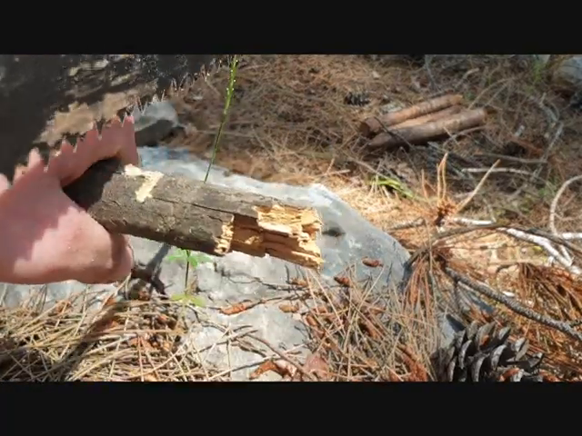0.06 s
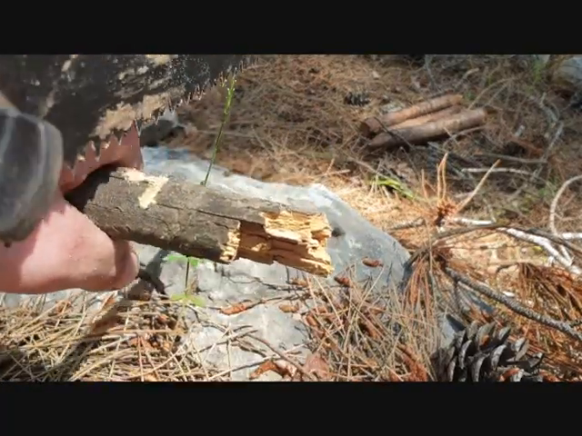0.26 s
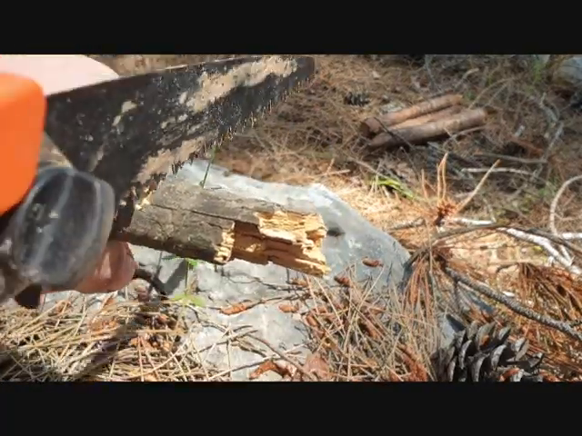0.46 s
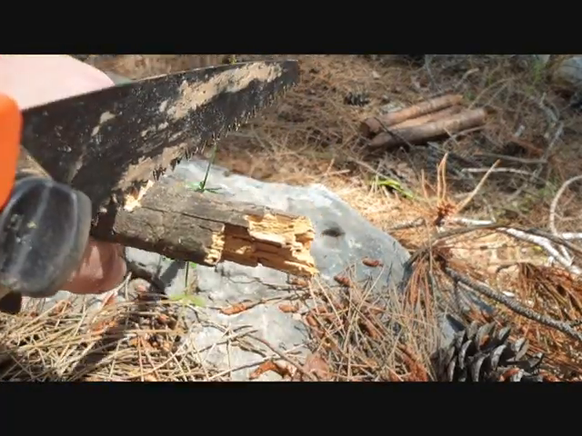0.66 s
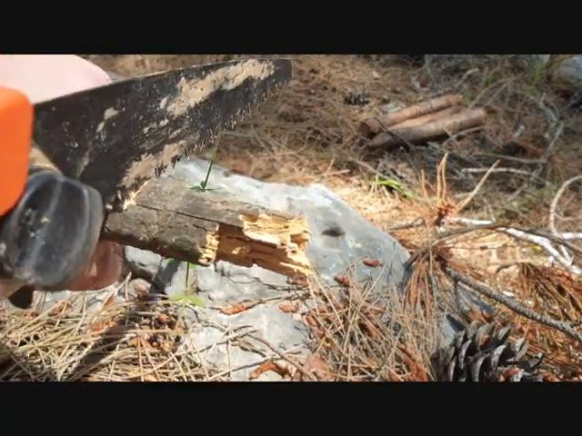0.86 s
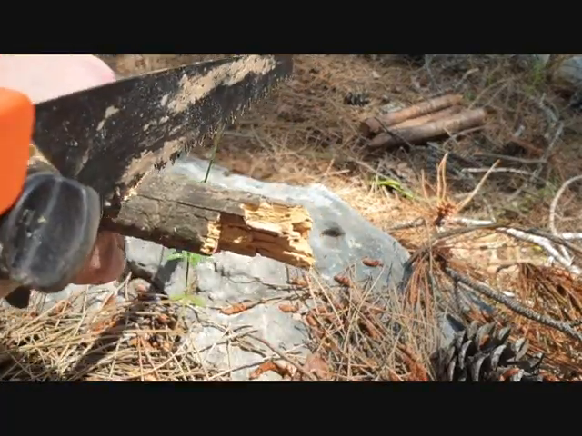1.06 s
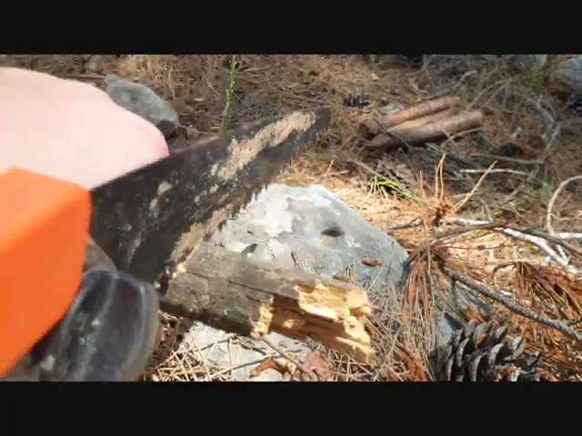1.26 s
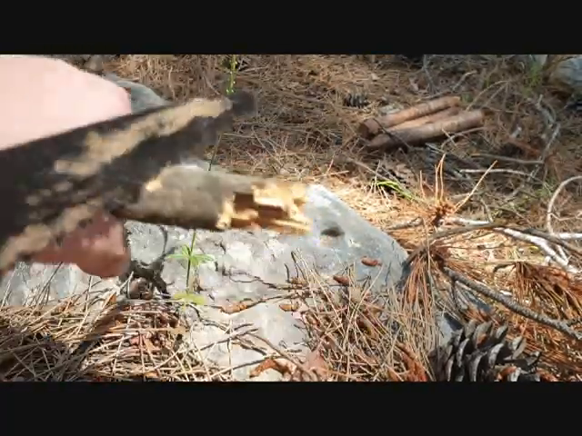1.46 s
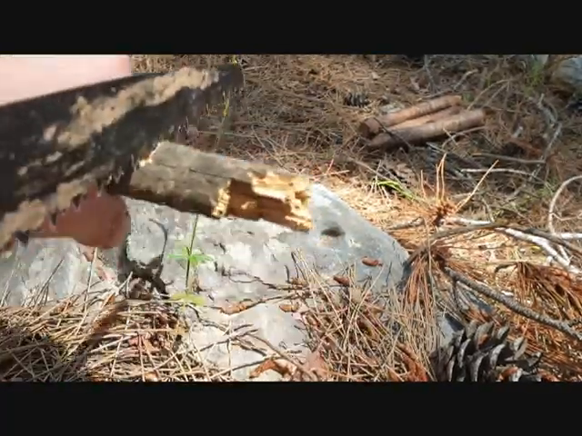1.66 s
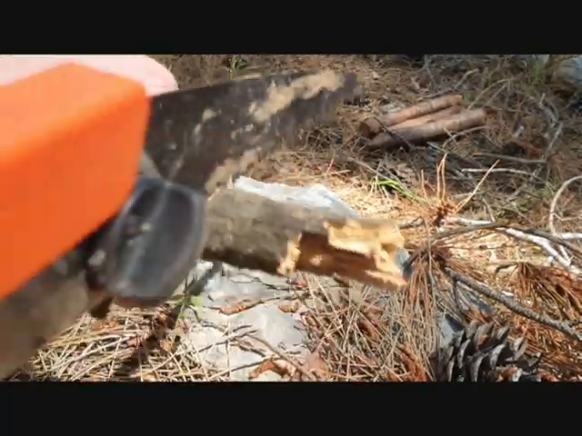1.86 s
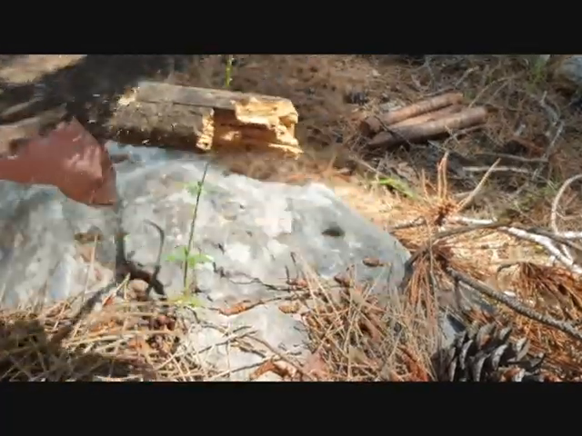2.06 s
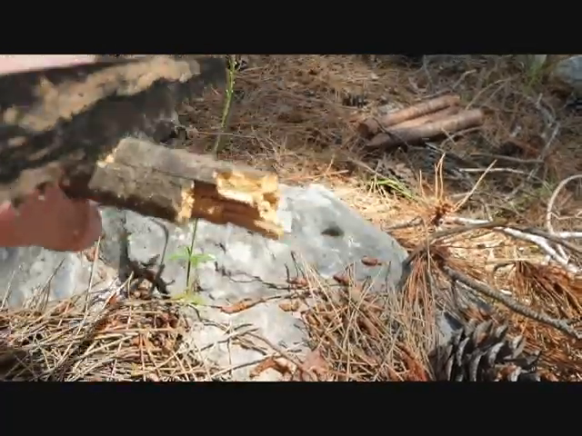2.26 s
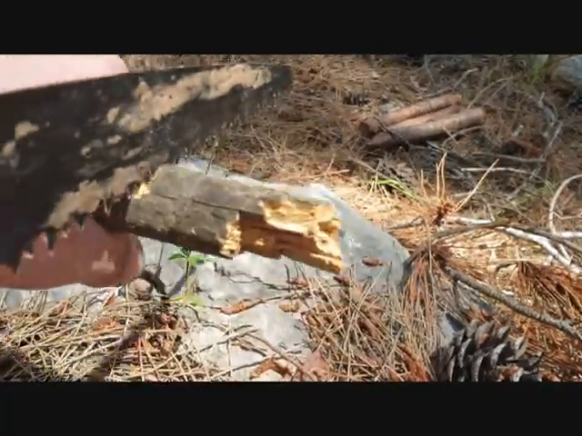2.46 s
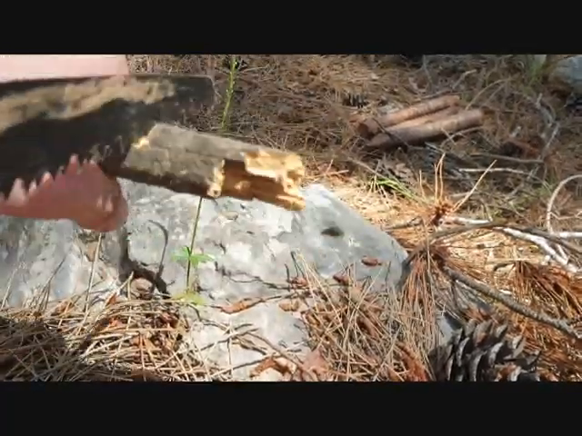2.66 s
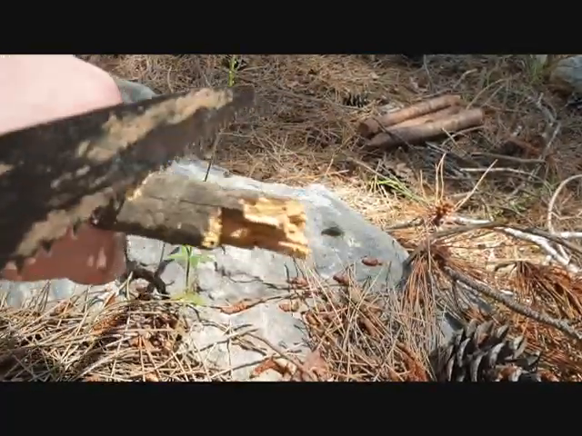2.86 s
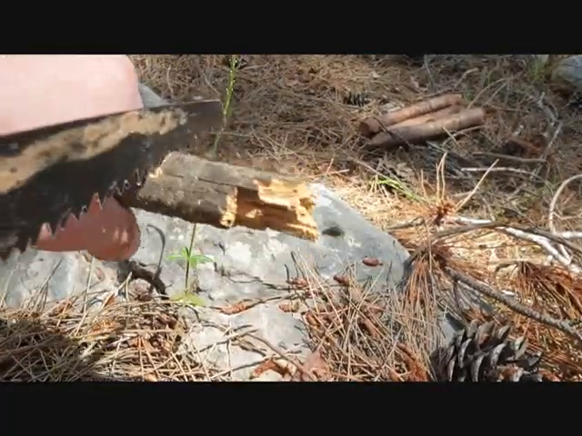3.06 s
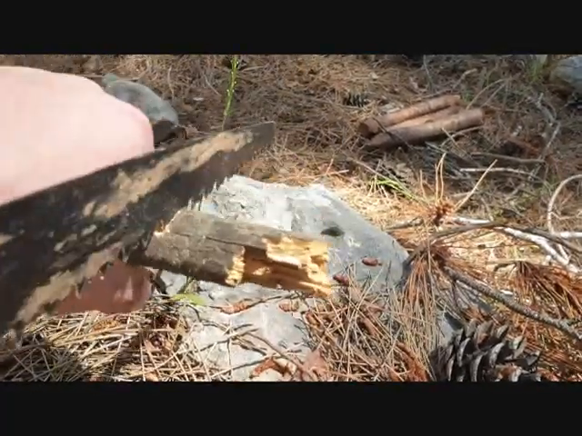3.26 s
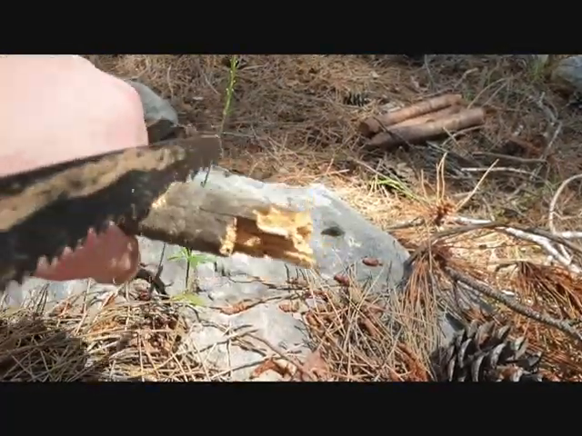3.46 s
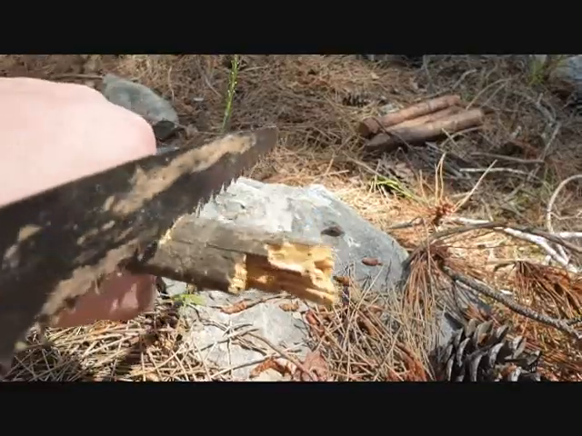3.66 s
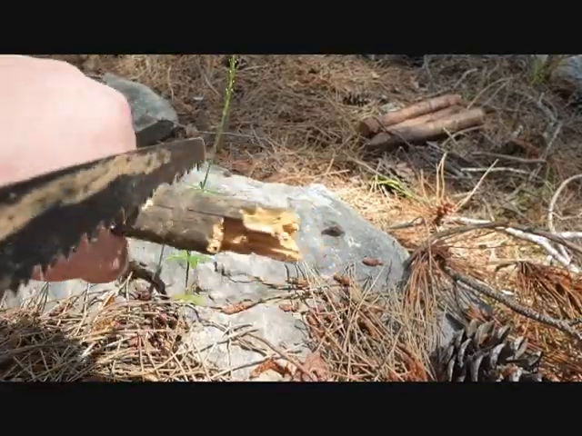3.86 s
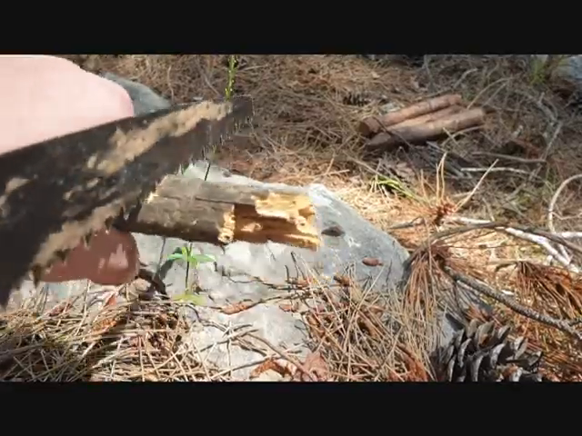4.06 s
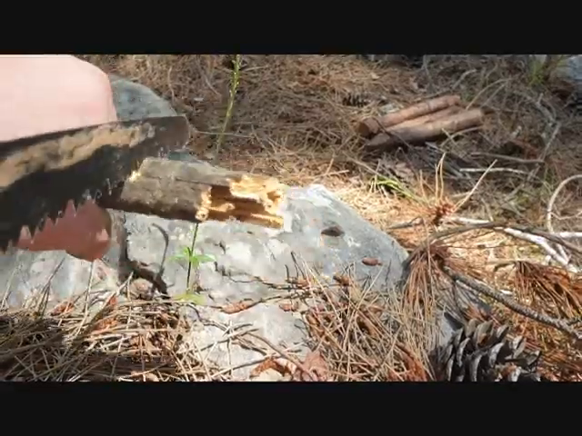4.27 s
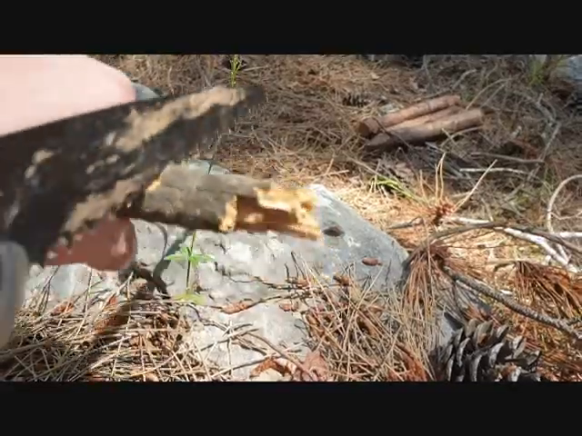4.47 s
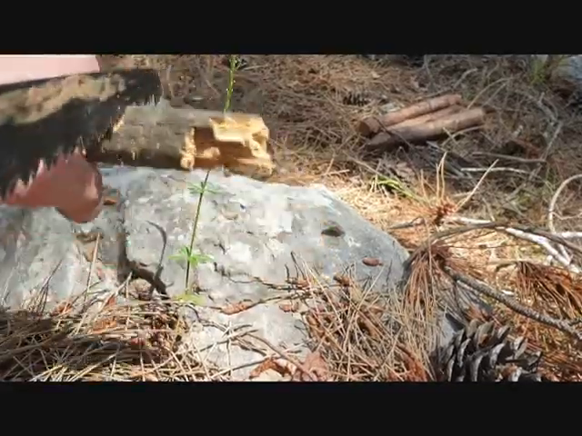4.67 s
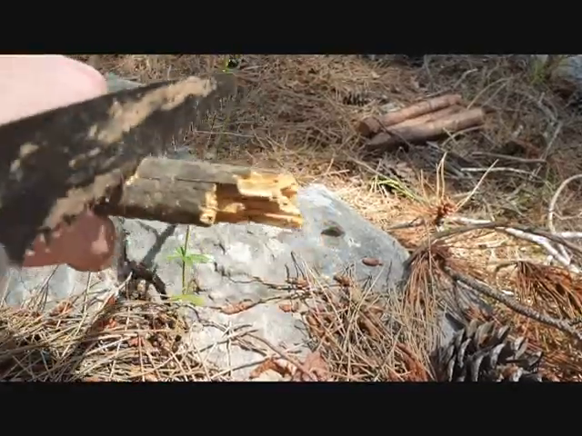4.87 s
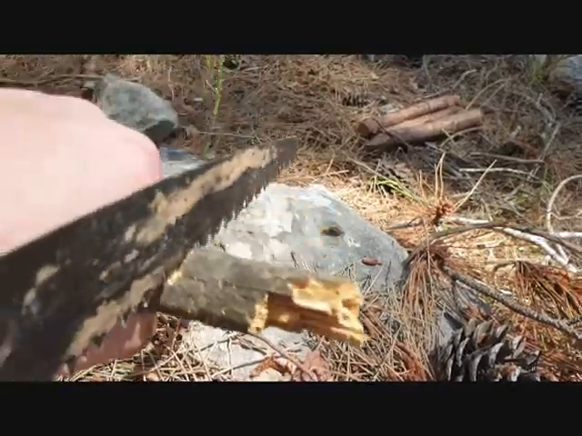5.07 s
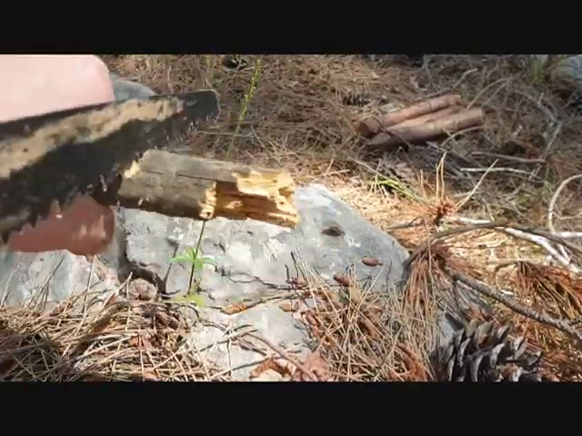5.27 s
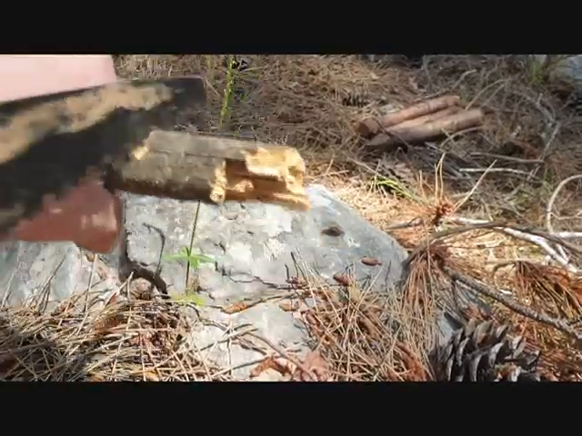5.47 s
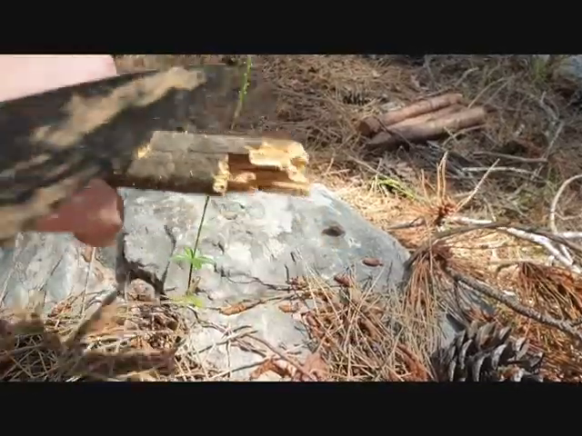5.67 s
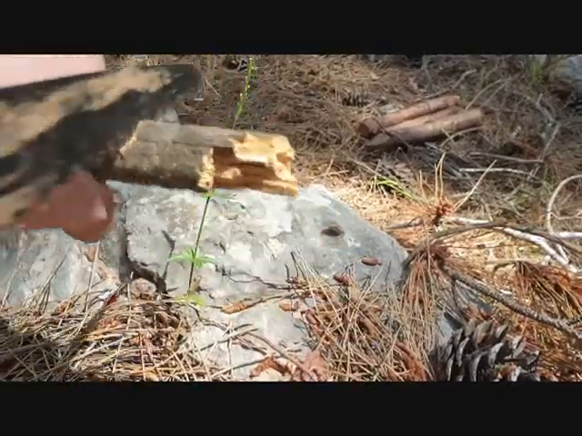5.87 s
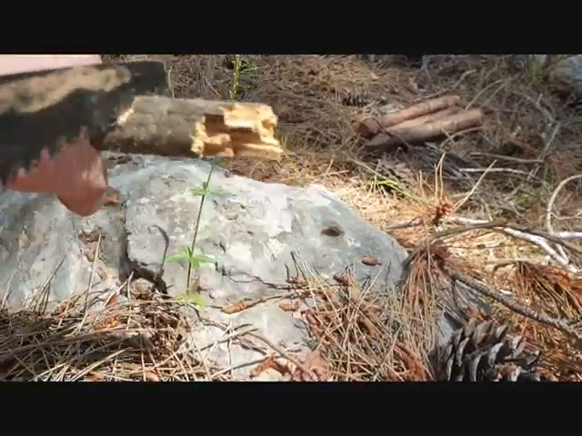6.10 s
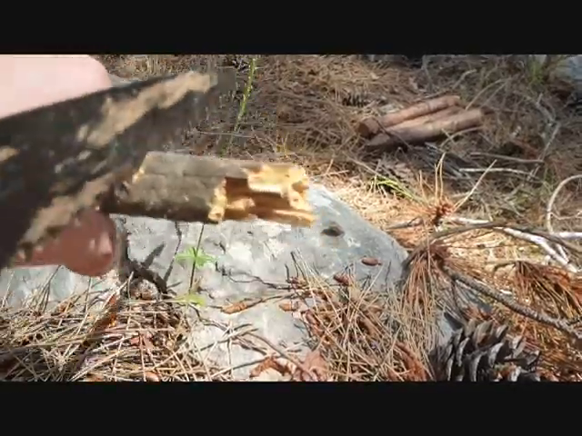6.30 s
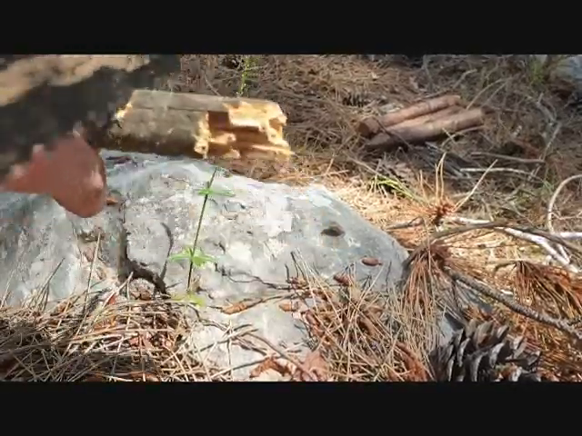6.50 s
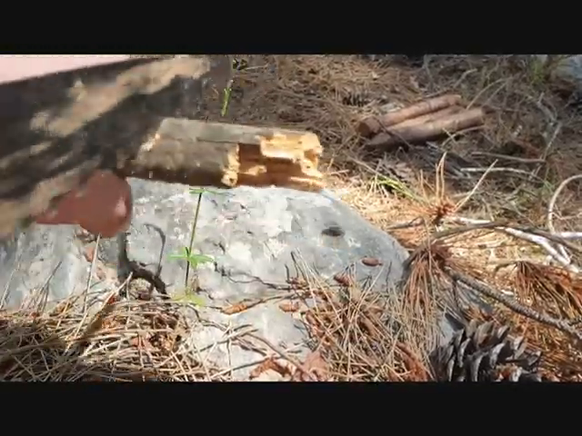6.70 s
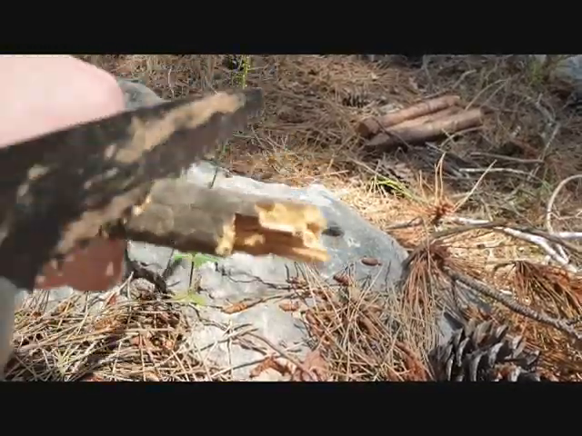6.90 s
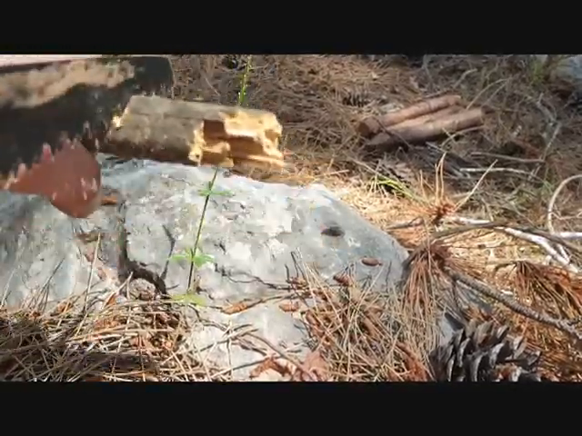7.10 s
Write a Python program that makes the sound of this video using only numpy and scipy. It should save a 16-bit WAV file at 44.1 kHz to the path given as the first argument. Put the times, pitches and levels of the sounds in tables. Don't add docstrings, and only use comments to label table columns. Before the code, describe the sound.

Near silence in a pine wood: faint wind, thin insects and hiss, with a few tiny brushes of a saw on bark. Then quick sawing begins, alternating strokes rasping harshly through a dry stick, teeth snagging in crackly jerks, low thuds shaking the microphone. It continues unevenly to the end. Very close, bright and dry, strongly to the left.

```python
import sys
import numpy as np
from scipy import signal
from scipy.fft import rfft, irfft
from scipy.io import wavfile
from scipy.ndimage import uniform_filter1d

SR = 44100
rng = np.random.default_rng(int(sys.argv[2]) if len(sys.argv) > 2 else 0)


def voltage_ratio(decibels):
    exponent = np.asarray(decibels, float) / 20
    return 10 ** exponent


def output_pcm(signal):
    pcm = np.clip(np.atleast_2d(signal).T, -1, 1) * 32767
    wavfile.write(sys.argv[1], SR, np.round(pcm).astype(np.int16))


N = 314874
HOP = 64

# start t/s, speeding up t/s, slowing down t/s, scrape level/dB, wood body level/dB
PULLS = [(1.508, 0.05, 0.077, -21, -15), (2.024, 0.15, 0.11, -32.5, -11), (2.604, 0.064, 0.086, -26.5, -14),
         (3.027, 0.065, 0.091, -29.5, -17.5), (3.41, 0.092, 0.064, -32, -14),
         (3.846, 0.046, 0.11, -29, -13), (4.204, 0.07, 0.087, -29.2, -14),
         (4.644, 0.085, 0.075, -26, -18.5), (5.246, 0.047, 0.11, -30.5, -11),
         (5.377, 0.081, 0.078, -37.5, -11), (5.749, 0.083, 0.07, -26.5, -26.5),
         (6.106, 0.09, 0.092, -29, -13), (6.446, 0.062, 0.077, -24, -16), (6.726, 0.12, 0.071, -27, -13.5),
         (7.061, 0.09, 0.12, -29, -11)]
PUSHES = [(1.83, 0.052, .18, -34.5, -12), (2.274, .1, 0.14, -37, -9.5), (2.809, 0.059, 0.12, -29.5, -13),
          (3.193, .089, 0.074, -34, -10), (3.622, .03, 0.091, -30, -10), (3.999, 0.083, 0.086, -31.5, -9.5),
          (4.428, 0.055, 0.14, -29, -11), (4.816, 0.059, 0.11, -30, -12.5), (5.535, 0.08, 0.13, -31, -7.5),
          (5.945, 0.054, 0.093, -25, -9.5), (6.259, .09, 0.073, -27.5, -12),
          (6.602, 0.049, .11, -25.5, -10.5), (6.916, 0.074, 0.079, -25, -10)]
BRUSHES = [
    (.59, 0.012, 0.036, -74, -23),
    (.766, 0.013, .03, -74, -5),
    (.82, 0.015, 0.042, -79.5, -1),
    (0.983, 0.03, .03, -56.5, -7),
    (1.149, 0.017, 0.061, -53.5, -13),
    (3.565, 0.044, .06, -46.5, -12),
]
# start t/s, length t/s, contact level/dB
LIFTS = [(1.634, .2, -19.5), (2.493, .11, -23), (2.748, 0.088, -19.5), (2.97, 0.05, -9.5),
         (3.352, 0.053, -4.5), (3.743, 0.074, -27), (4.163, .05, -8), (4.367, 0.037, -11),
         (4.98, .275, -14), (5.905, .045, -7.5), (6.431, 0.011, -4.5), (6.58, 0.032, -6.5)]
# t/s, level/dB, top minus middle level/dB
HARD_SNAGS = [(1.5288, -16.5, 15), (1.5444, -12, 12), (1.5586, -11, 18), (1.5725, -4.5, -1),
              (1.8992, -7.5, -6.5), (1.921, -8.5, 3.5), (1.973, -28, 8.5), (1.9892, -31, -5.5),
              (2.0042, -25.5, -7), (2.1274, -13.5, -9), (2.1335, -11.5, 1.5), (2.17, -22, -1),
              (2.322, -20.5, -8), (2.3506, -7, 4), (2.382, -15.5, 3.5), (2.4064, -15.5, 0),
              (2.4424, -22.5, 0.5), (2.6583, -11.5, -6.5), (2.6773, -9, -2), (2.7056, -11, -8.5),
              (2.856, -17.5, -4.5), (2.889, -19.5, 7.5), (3.0676, -11, -12), (3.0959, -8.5, -3),
              (3.112, -18, -2), (3.1252, -27.5, 0), (3.2558, -21.5, -5.5), (3.479, -5.5, 6.5),
              (3.659, -12.5, 6), (3.9035, -5, -4.5),
              (4.0461, -21, -7.5), (4.0547, -24, -2), (4.2658, -13.5, 9.5), (4.541, -17, -4.5),
              (4.704, -10, 1.5), (4.7194, -5.5, -2.5), (4.7369, -18.5, 17), (4.846, -17.5, 19.5),
              (4.894, -11.5, 9), (4.907, -5.5, -5), (5.297, -13.5, 8), (5.3408, -14.5, 0),
              (5.5584, -18, -1.5), (5.5815, -18.5, -3.5), (5.6161, -17.5, -9.5), (5.79, -21, 5),
              (6.0295, -17.5, 16.5), (6.1711, -6.5, 11.5), (6.2049, -7.5, -1), (6.315, -19, 8),
              (6.3665, -13, 3), (6.4776, -10.5, -5), (6.499, -10.5, -9.5), (6.5296, -6.5, 0.5),
              (6.6383, -11.5, 16), (6.7994, -11, 0), (6.827, -5.5, -10), (6.8398, -19, 0.5),
              (6.948, -24.5, -5.5), (7.128, -11, 7)]
# t/s, level/dB, top minus middle level/dB
TOUCHES = [(.596, -52, -2), (0.6112, -47, -2), (.768, -53, 10), (0.7885, -46, 20), (0.83, -51.5, -11),
           (1.0079, -30.5, -1.5), (1.1523, -28, -13.5), (1.1546, -34, -15.5), (1.624, -18, -11),
           (1.7939, -53, 16), (1.8076, -46, 21.5), (1.8581, -24.5, -4), (2.4889, -30.5, -8.5),
           (2.5111, -52, -10), (2.5778, -62, -17), (2.6147, -23, 11.5), (2.7644, -39, -3.5),
           (2.8158, -24.5, 3), (3.2043, -39.5, 6.5), (3.577, -30, 25.5), (3.6302, -12.5, 15),
           (3.79, -53.5, 13), (4.226, -15.5, -0.5), (4.3755, -27.5, 9.5), (4.397, -37, -10.5),
           (4.435, -10, 1), (4.8245, -23.5, 18.5), (5.9217, -27, 17.5), (5.948, -26, 9),
           (5.9693, -16.5, 11)]
# f/Hz, level/dB, t60/s
MODES = [(254, -8, 0.011), (506, 4, 0.0098), (870, -20, 0.0057), (1602, -2.5, 0.015), (2612, -4, 0.019),
         (3106, -0.5, 0.028), (4532, -5, 0.011), (5143, -5, .011), (5870, -11, 0.0037), (7070, 1, 0.0037),
         (7970, 6.5, 0.0093), (9500, -5.5, 0.0018), (10860, -2.5, 0.0014), (13340, 2.5, 0.0021),
         (14840, -5.5, 0.0056)]
# t/s, centre f/Hz
BITE_REGION = [
    (1.2, 2300),
    (1.5, 2800),
    (1.7, 2800),
               (1.85, 4030),
    (2.4, 5080),
    (7.14, 4960),
]
# f/Hz, level/dB per Hz
CUT_SPECTRUM = [(88, -44), (150, -11.5), (259, -7), (382, -14.5), (474, -8), (1140, -7), (3070, -5.5),
                (3460, -6), (5000, -2.5), (8640, -10.5), (9340, -6), (13500, -7.5), (15800, -7.5)]
# f/Hz, left minus right level/dB
SHADOW = [(60, 11.5), (110, 10), (200, 17), (380, 13), (700, 13.5), (1290, 10), (2380, 13), (4400, 14.5),
          (8120, 19), (15000, 19.5)]
# f/Hz, level/dB per Hz
SHAKE_SPECTRUM = [(12, -34.5), (20, -20.5), (65, 4), (82, 2), (119, -8.5), (200, -15), (260, -49.5),
                  (440, -120)]
# t/s, level/dB
WIND = [(0.0, -44.5), (0.24, -60), (1.431, -50.5), (1.749, -64.5), (2.1, -48.5), (2.54, -60.5), (3.5, -60),
        (4.6, -57.5), (5.1, -57.5), (5.7, -52), (6.8, -47), (7.14, -50)]
# t/s, level/dB
GRIP = [(1.5, -3), (2.1, 1), (2.9, 4), (3.45, -2.5), (3.65, -8), (4.2, 0.5), (4.9, 1.5), (5.3, -2.5),
        (5.7, -2.5), (6.6, -1), (6.85, 4), (7.14, 0)]
# t/s, peak level/dB, f/Hz, left minus right level/dB
KNOCKS = [(1.191, -41, 68, 26), (2.038, -11, 250, -8), (2.055, -27, 146, -1), (2.169, -41, 71, 14),
          (4.58, -42, 60.5, 12.0), (3.37, -41, 61, 12), (0.02, -42, 40, 12), (5.178, -24.5, 56.5, 31),
          (5.297, -29.5, 72.7, 13), (6.17, -27, 66.6, 20), (6.84, -40, 67.3, 10)]
# f/Hz, level/dB per Hz
WOOD_SPECTRUM = [(71, -45.5), (120, -10), (138, -12), (208, -13.5), (240, -13.5), (307, -19), (417, -30.5),
                 (870, -32), (1850, -40.5), (2510, -32), (5040, -52), (6700, -37), (8390, -55),
                 (13700, -39.5), (15800, -57)]

RISE_POWER, FALL_POWER = 1.705, 2.98
DUST_DB, DUST_S = -17, 0.11
LIFT_SLEW_S = 0.012
SLOW_WOOD_DB_PER_DB, SLOW_SIZZLE_DB_PER_DB = 0.1, 0.21
LESSER_PER_S, LESSER_DB, LESSER_SPREAD_DB = 70, 5.5, 3
TRICKLE_S, TRICKLE_DB, TRICKLE_FADE_S = 4.96, -61.5, 0.12
PORT_LAG_S = 3.4e-4
PULL_JOLT_DB, PUSH_JOLT_DB, JOLT_POWER, JOLT_S = -12, -18.5, 0.84, 0.013
WOOD_DB = -64.5
TOP_HZ = 15700


def saw():
    moving = strokes(PULLS + PUSHES + BRUSHES)
    effort, woody = moving + contact() * linger(moving, DUST_DB, DUST_S)
    slack = np.clip(effort / effort.max(), 0.003, 1)
    fine, coarse, tear = rng.standard_normal((3, 2, N))
    tear = tear / np.sqrt(uniform_filter1d(tear ** 2, size=16, axis=1))
    scrape = fine * grains(5000, 1.8, 0.0004) * voltage_ratio(1.5 * walk(40))
    bites = coarse * grains(200, 2.0, 0.0045)
    force = (1.028 * scrape + 0.69 * bites) * voltage_ratio(5.5)
    snap, bright = snags(moving[0])

    low = force * woody * slack ** -SLOW_WOOD_DB_PER_DB * voltage_ratio(11)
    low = low + voltage_ratio(-7.5) * tear * fade(snap, 0.0031)
    middle = force * effort + tear * (fade(snap, 0.0008) + 0.35 * fade(snap, 0.009))
    top = force * effort * slack ** SLOW_SIZZLE_DB_PER_DB * voltage_ratio(5)
    top = top + force * trickle()
    top = top + tear * (fade(bright, 0.0007) + 0.35 * fade(bright, 0.007))

    bass = soft(soft(low, 2700), 2700)
    rest = soft(soft(middle, 2700), 2700)
    push = bass + soft(middle, 6920) - rest + top - soft(top, 11540)
    faces = colour(push + body(push), CUT_SPECTRUM)
    gain = np.std(band(middle[0], 1400, 11540)) / np.std(band(faces[0], 1500, 6370))
    ports = at_ports(faces * gain)
    return ports + ground_wash(ports[:1])


def strokes(rows):
    out = np.full((2, N), 1e-9)
    for start_s, rise_s, fall_s, scrape_db, wood_db in rows:
        i = int(start_s * SR)
        t = np.arange(min(int((rise_s + fall_s) * SR), N - i)) / SR
        up = np.clip(t / rise_s, 0, 1) * np.pi / 2
        down = np.clip((t - rise_s) / fall_s, 0, 1) * np.pi / 2
        speed = np.sin(up) ** RISE_POWER * np.abs(np.cos(down)) ** FALL_POWER
        out[:, i:i + len(t)] += voltage_ratio(np.array([[scrape_db], [scrape_db + wood_db]])) * speed
    return out


def contact():
    db = np.zeros(N)
    for start_s, length_s, lift_db in LIFTS:
        db[int(start_s * SR):int((start_s + length_s) * SR)] = lift_db
    return voltage_ratio(uniform_filter1d(db, int(LIFT_SLEW_S * SR)))


def grains(per_s, spread_db, tau_s):
    when = rng.random(N) < per_s / SR
    size = rng.exponential(1, N)
    return level(fade(when * voltage_ratio(np.minimum(spread_db * size, 14)), tau_s))


def snags(stroke):
    when = rng.random(N) < LESSER_PER_S / SR
    size, tilt = rng.exponential(1, N), rng.standard_normal(N)
    lesser = when * stroke * voltage_ratio(LESSER_DB + np.minimum(LESSER_SPREAD_DB * size, 4))
    snap = lesser * voltage_ratio(-3.0 * tilt - 4)
    bright = lesser * voltage_ratio(3.0 * tilt - 2)
    for s, db, tilt_db in HARD_SNAGS + TOUCHES:
        snap[int(s * SR)] = voltage_ratio(db - tilt_db / 2 - 4.5)
        bright[int(s * SR)] = voltage_ratio(db + tilt_db / 2)
    return snap, bright


def trickle():
    after_s = np.arange(N) / SR - TRICKLE_S
    running = (after_s > 0) * (after_s < 0.2)
    return voltage_ratio(TRICKLE_DB) * running * np.exp(-np.abs(after_s) / TRICKLE_FADE_S)


def body(push):
    t = np.arange(N // HOP + 1) * HOP / SR
    bite_hz = np.interp(t, *np.transpose(BITE_REGION))
    out = 0
    for hz, db, t60_s in MODES:
        shift, swell, flicker = (walk(rate_hz, size=HOP) for rate_hz in (14, 10, 50))
        favour_db = 7.5 * np.exp(-(np.log2(hz / bite_hz) / 0.51) ** 2)
        drive = voltage_ratio(db + 2.0 + favour_db + 2.5 * swell + 5.7 * flicker)
        mode_hz = hz * (1 + 0.028 * shift)
        out = out + ring(push * drive.repeat(HOP)[:N], mode_hz.repeat(HOP)[:N], t60_s)
    return out


def ring(x, hz, t60_s):
    turn = np.exp(2j * np.pi * np.cumsum(hz) / SR)
    keep = np.exp(-np.log(1000) / (t60_s * SR))
    return (signal.lfilter([2 - 2 * keep], [1, -keep], x * turn.conj()) * turn).real


def at_ports(faces):
    near, other = faces
    far = 0.5 * near + 0.5 * soft(near, 540) + 1.5 * (other - 0.11 * soft(other, 700))
    late = np.concatenate([np.zeros(int(PORT_LAG_S * SR)), far])[:N]
    return np.array([near, colour(late, [(hz, -db) for hz, db in SHADOW])[0]])


def ground_wash(near):
    t = np.arange(int(0.2 * SR)) / SR
    wash = rng.standard_normal((2, len(t))) * np.exp(-np.log(1000) * t / 0.15) * voltage_ratio(-51.5)
    return signal.oaconvolve(near, wash, axes=1)[:, :N]


def thuds():
    t = np.arange(N) / SR
    wind_db = np.interp(t, *np.transpose(WIND))
    grip_db = np.interp(t, *np.transpose(GRIP))
    jolt = voltage_ratio(PULL_JOLT_DB) * strokes(PULLS)[0] ** JOLT_POWER
    jolt = jolt + voltage_ratio(PUSH_JOLT_DB) * strokes(PUSHES)[0] ** JOLT_POWER
    both, left, right = rng.standard_normal((3, N))
    shake = level(colour([both + 0.84 * left, both + 0.52 * right], SHAKE_SPECTRUM))
    shake = shake * voltage_ratio(1.4 * walk(14, size=HOP)).repeat(HOP)[:N]
    strength = 0.69 * voltage_ratio(wind_db) + linger(jolt, -6.5, JOLT_S) * voltage_ratio(grip_db)
    share = 1 + strength / (strength + voltage_ratio(-47.5))
    out = shake * strength * np.array([share, 2 - share])
    for s, db, hz, side_db in KNOCKS:
        hit = knock(hz)
        i = int(s * SR)
        sides_db = np.array([[side_db], [-side_db]]) / 2 - abs(side_db) / 2
        out[:, i:i + len(hit)] += voltage_ratio(db + sides_db) * hit
    return out


def knock(hz):
    t = np.arange(int(0.12 * SR)) / SR
    blow = np.sin(2 * np.pi * hz * t) * np.exp(-((t * hz - 1.05) / 0.5) ** 2)
    rattle = band(rng.standard_normal(len(t)), 0.5 * hz, 2.16 * hz)
    rattle = rattle * t * hz * np.exp(-t / 0.01) * np.sqrt(280 / hz)
    return blow + 0.5 * rattle


def wood():
    both, left, right = rng.standard_normal((3, N))
    breeze = band(both, 60, 450) * voltage_ratio(2.0 * walk(9.7))
    fine = band(np.array([left, voltage_ratio(-9) * right * voltage_ratio(3.1 * walk(8.5))]), 450, 18000, order=1)
    fine = fine + voltage_ratio(7) * band(fine, 3960, 13000) * np.exp(-np.arange(N) / (0.12 * SR))
    return level(colour(breeze + voltage_ratio(2.5) * fine, WOOD_SPECTRUM), WOOD_DB)


def linger(x, db, tau_s):
    return voltage_ratio(db) * fade(x, tau_s) / (tau_s * SR)


def fade(x, tau_s):
    return signal.lfilter([1], [1, -np.exp(-1 / (tau_s * SR))], x + 1e-12)


def walk(rate_hz, size=1):
    k = int(SR / rate_hz / size)
    steps = np.repeat(rng.standard_normal(N // (k * size) + 2), k)
    slewed = uniform_filter1d(uniform_filter1d(steps, k), k)
    return 1.26 * slewed[:N // size + (size > 1)]


def level(x, db=0):
    return x * voltage_ratio(db) / np.sqrt(np.mean(np.mean(np.atleast_2d(x), axis=0) ** 2))


def soft(x, hz):
    return signal.lfilter(*signal.butter(1, hz, fs=SR), x)


def band(x, lo_hz, hi_hz, order=2):
    return signal.sosfilt(signal.butter(order, [lo_hz, hi_hz], "band", fs=SR, output="sos"), x)


def shape(table, hz):
    at_hz, db = np.transpose(table)
    return np.interp(np.log(hz + 1), np.log(at_hz), db)


def colour(x, table, size=4096):
    cep = irfft(shape(table, np.fft.rfftfreq(size, 1 / SR)) * np.log(10) / 20)
    cep[1:size // 2] *= 2
    cep[size // 2 + 1:] = 0
    impulse = irfft(np.exp(rfft(cep)))
    return signal.oaconvolve(np.atleast_2d(x), impulse[None], axes=1)[:, :N]


def scene():
    return saw() + thuds() + wood()


def band_limit(x):
    return signal.sosfilt(signal.butter(12, 16660, fs=SR, output="sos"), x)


def record(dry):
    cut = signal.sosfilt(signal.ellip(10, 0.2, 60, TOP_HZ, fs=SR, output="sos"), dry)
    mix = np.clip(cut, -1, 1)
    return band_limit(mix)


dry = scene()
out = record(dry)
output_pcm(out)
```